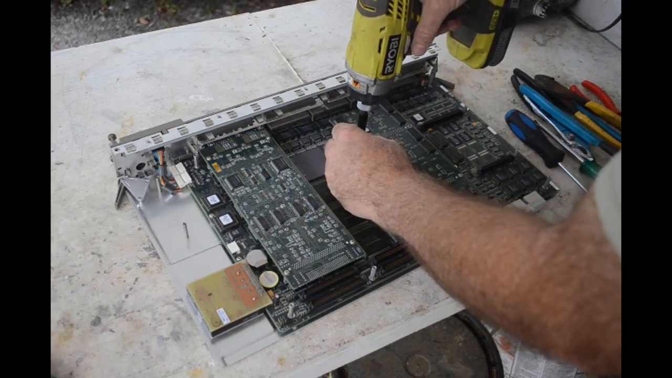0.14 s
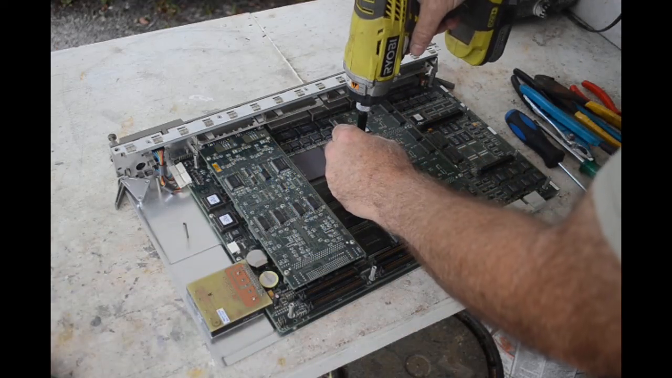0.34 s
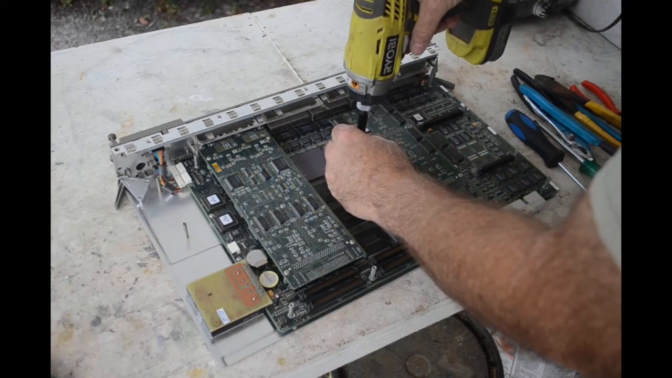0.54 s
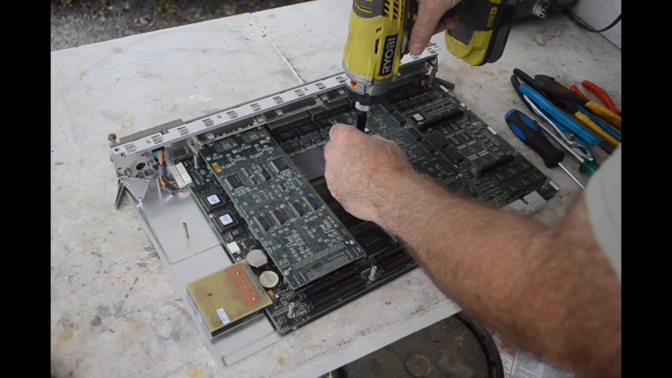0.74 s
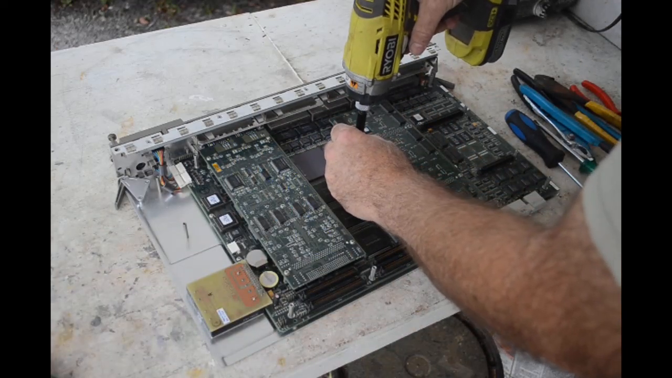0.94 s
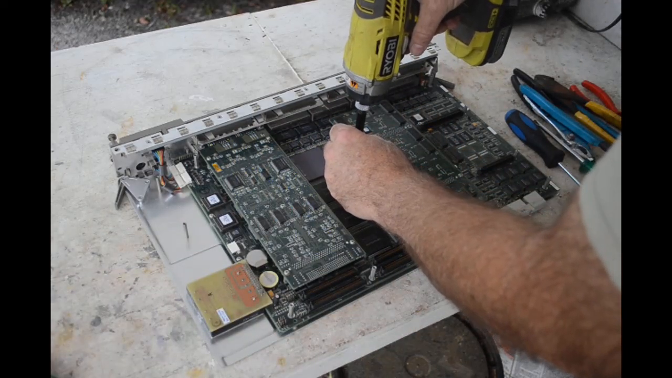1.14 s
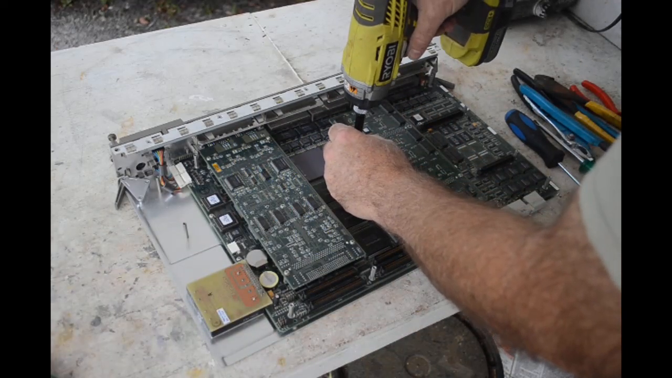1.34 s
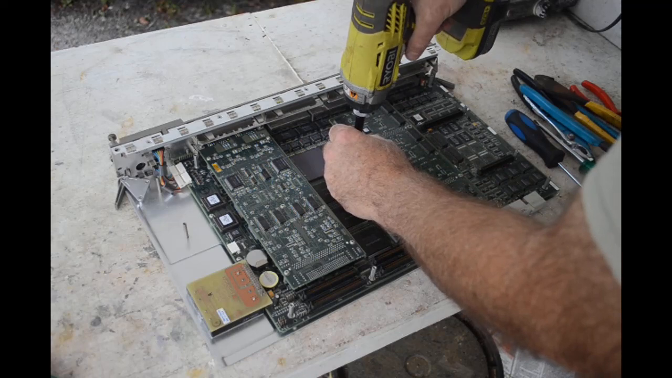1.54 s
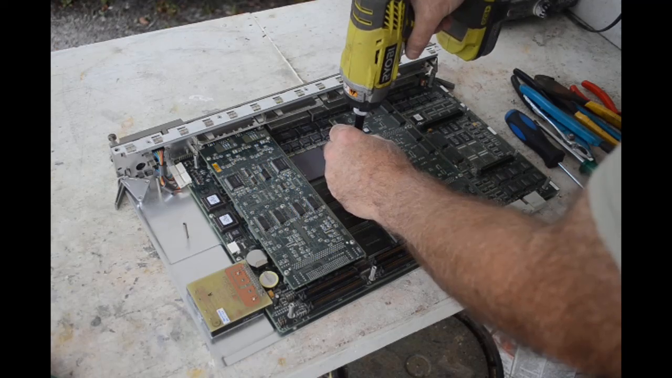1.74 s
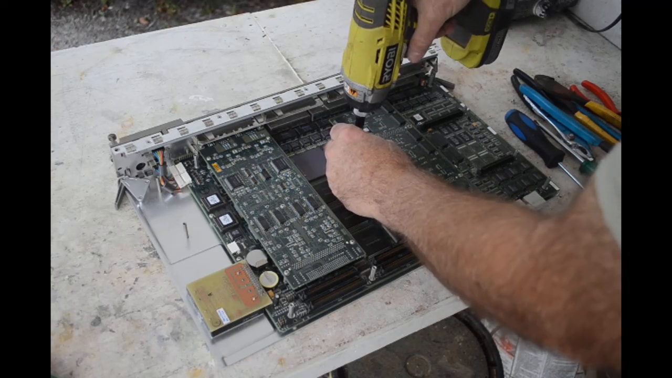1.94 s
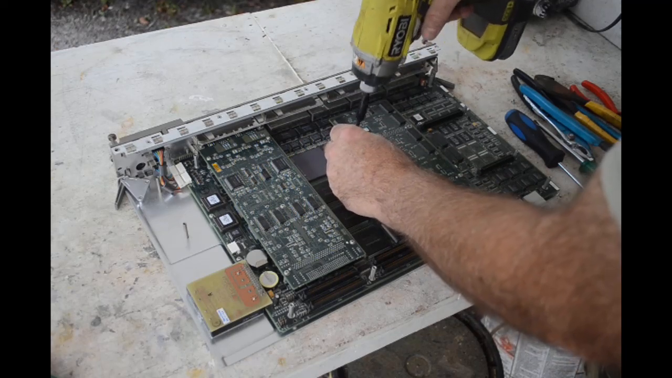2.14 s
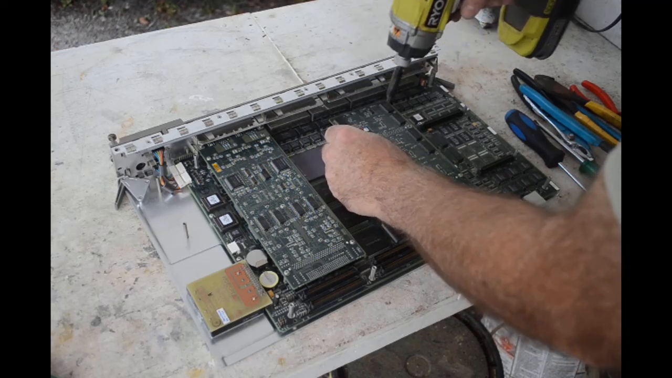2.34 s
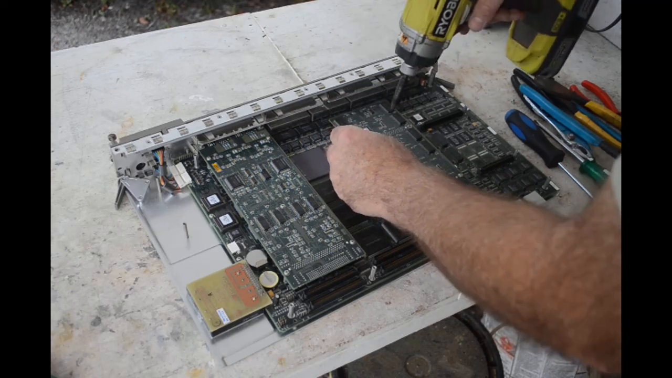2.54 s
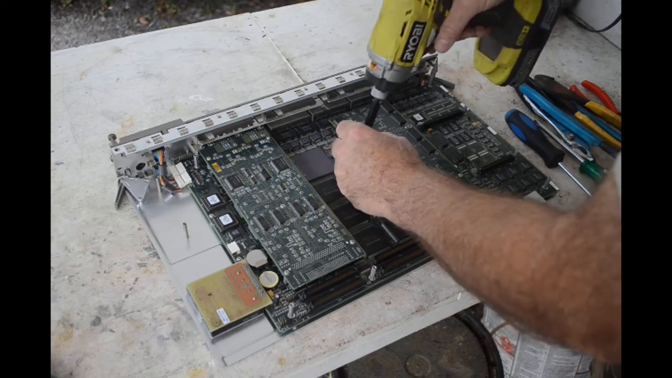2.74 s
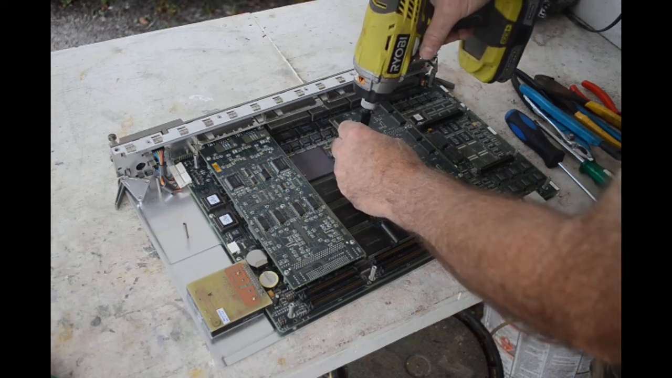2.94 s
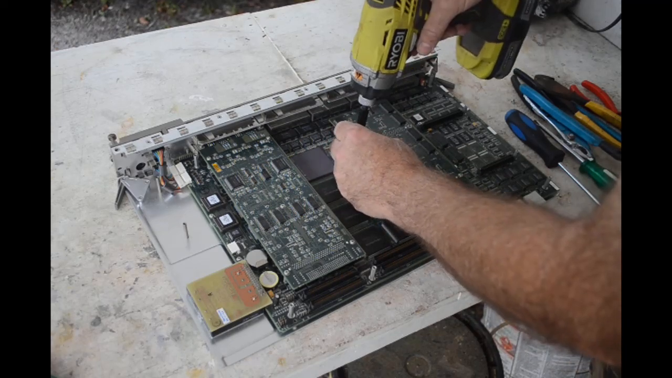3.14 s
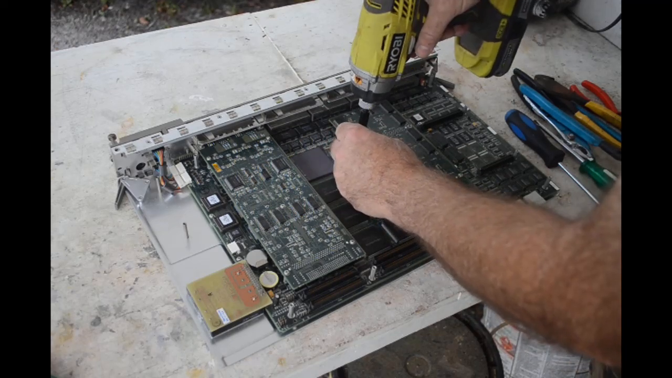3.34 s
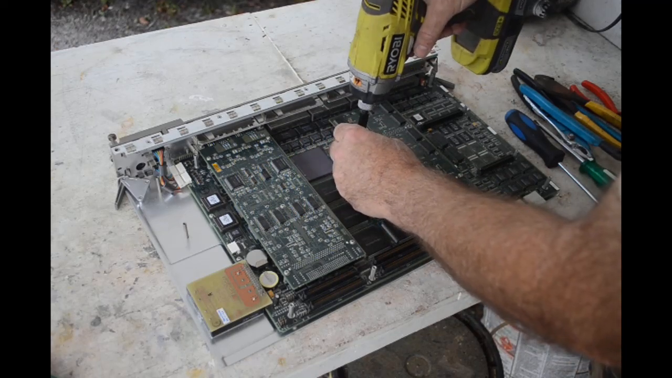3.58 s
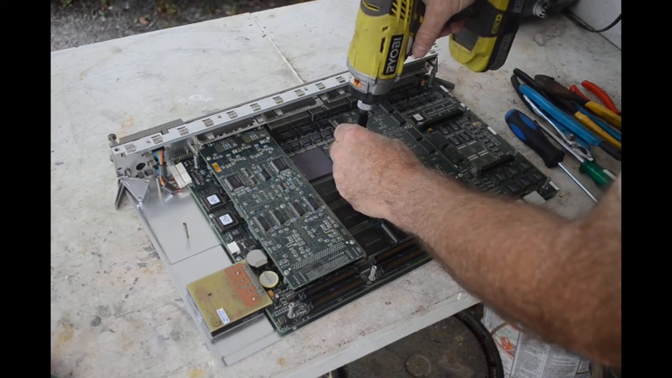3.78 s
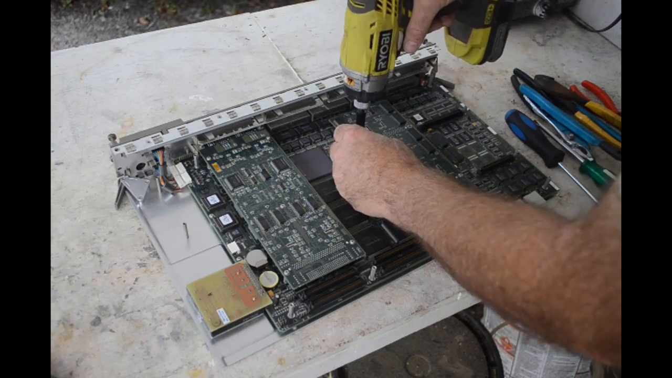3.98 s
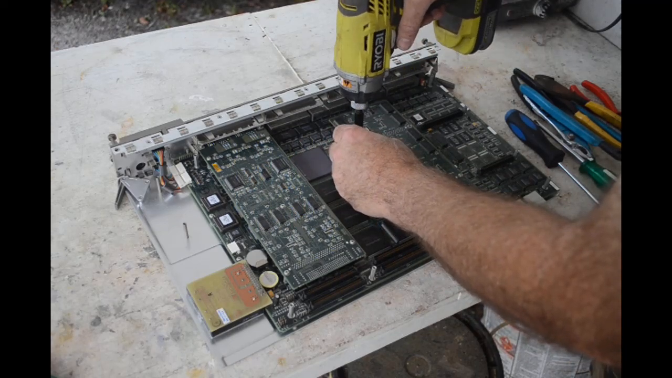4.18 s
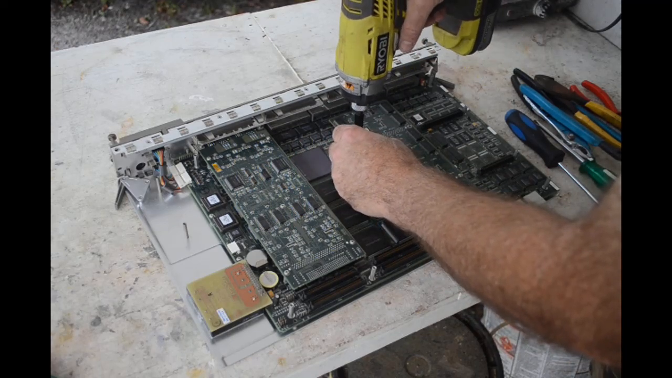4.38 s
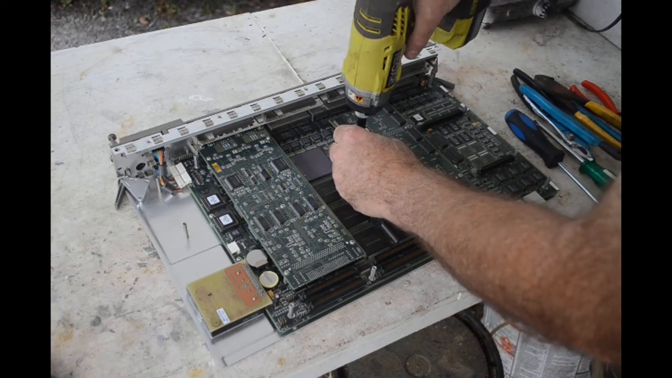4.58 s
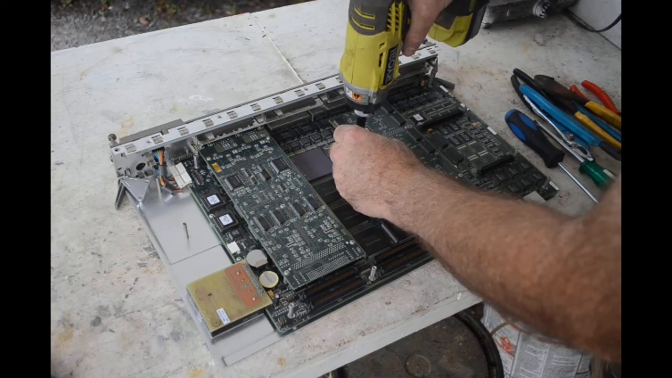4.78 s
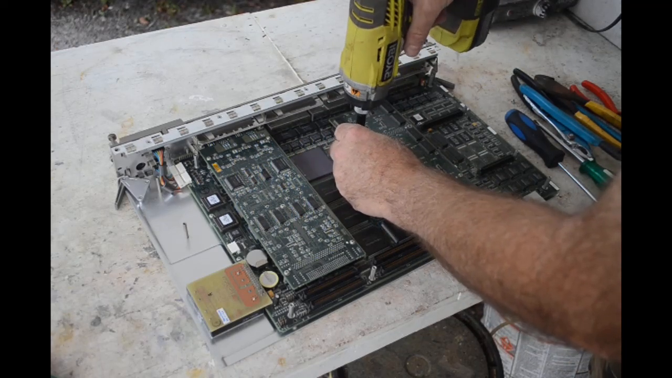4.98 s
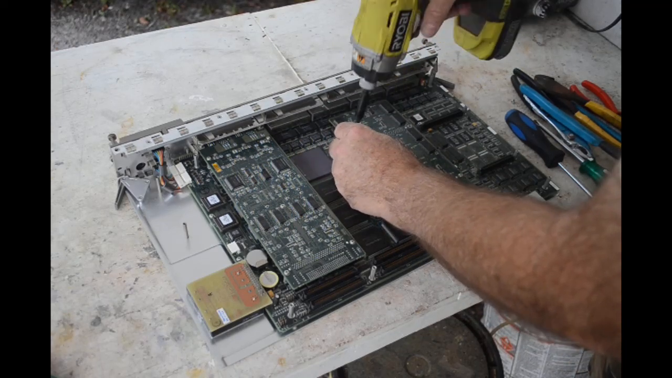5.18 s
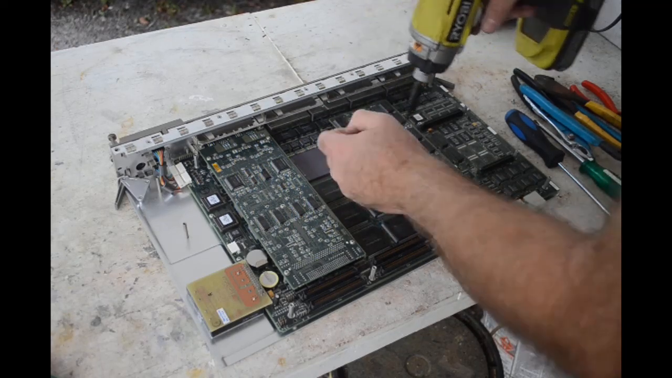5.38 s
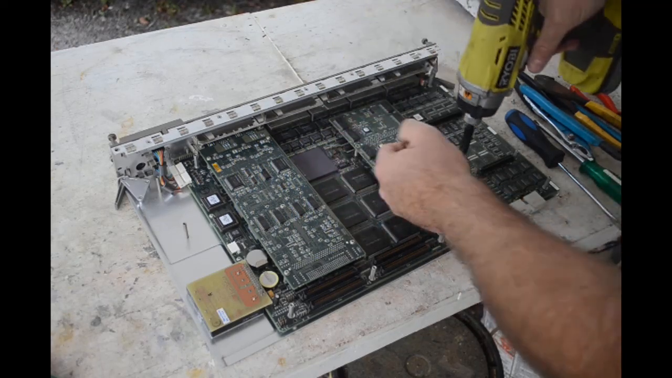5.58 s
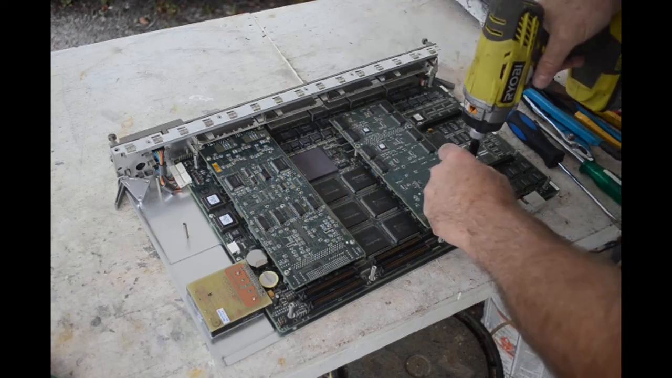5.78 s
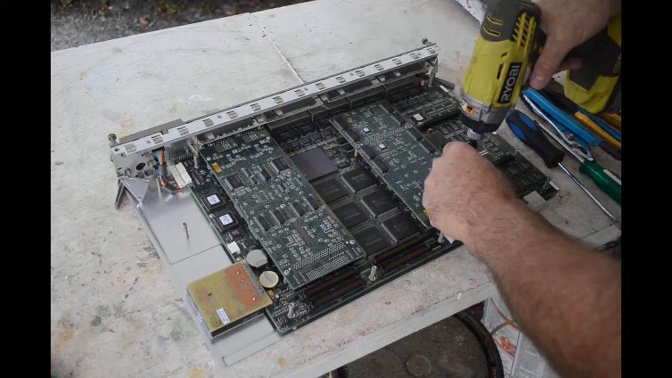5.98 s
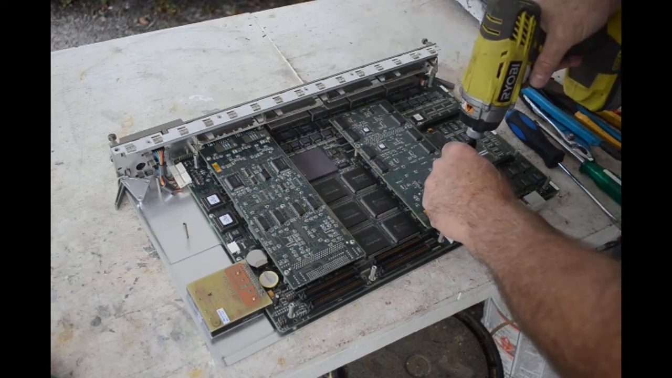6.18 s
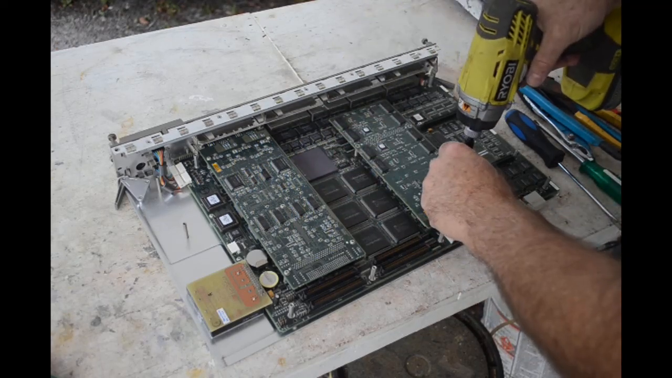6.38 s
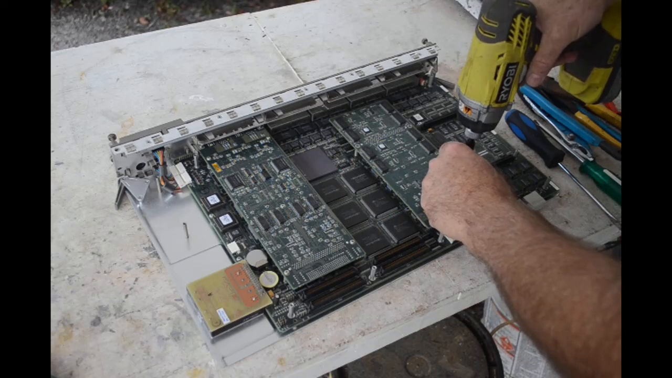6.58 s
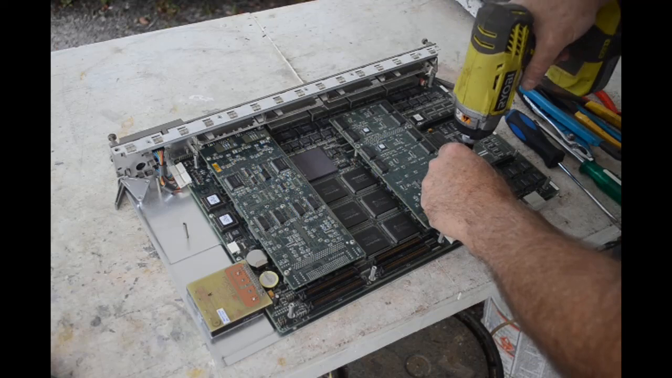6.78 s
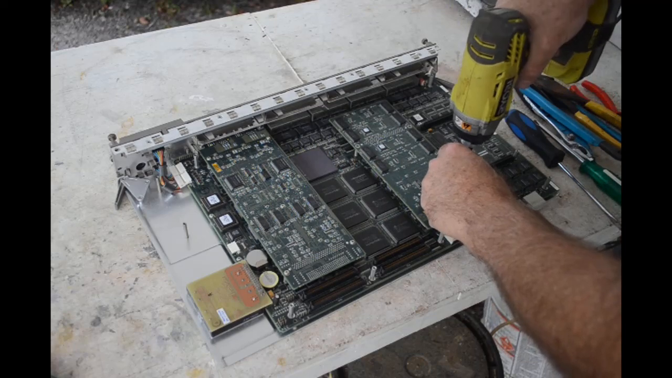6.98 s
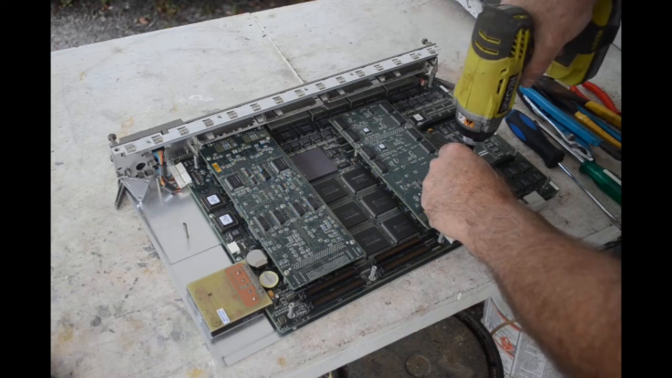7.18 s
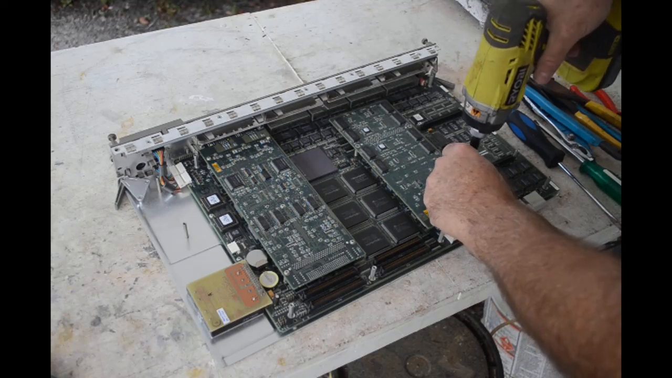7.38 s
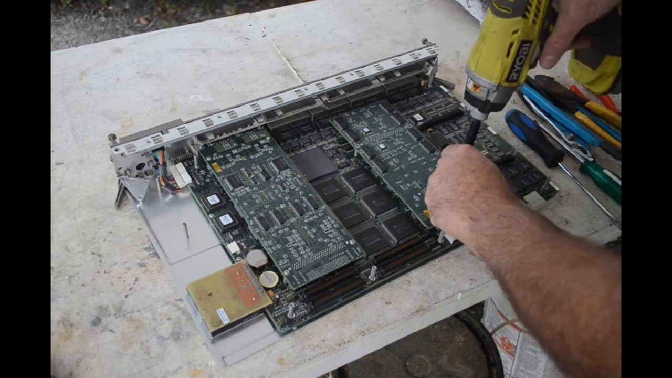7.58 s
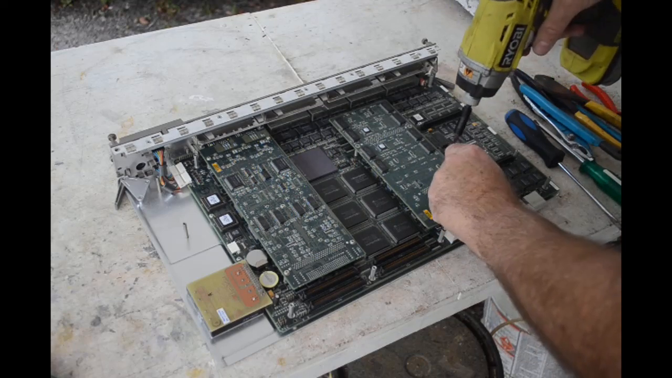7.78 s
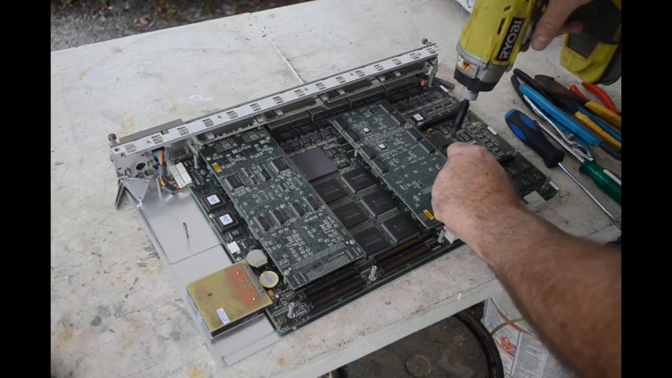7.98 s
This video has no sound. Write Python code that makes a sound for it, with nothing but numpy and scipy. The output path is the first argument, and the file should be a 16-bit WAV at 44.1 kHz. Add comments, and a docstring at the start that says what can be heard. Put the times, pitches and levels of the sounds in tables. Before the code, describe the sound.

Three brief drill runs rattle and whine against a board in a metal chassis, each ticking to a halt, with light taps and scuffs between.

```python
"""Short, squealing, whirring motor runs amid knocks: a cordless drill backs three small screws out of a circuit board
in a metal chassis on an outdoor table. Blows ring chassis modes amid noise clatter; the motor is gear rattle, brush hiss
and tones that follow its speed. The loose screw skips on its last thread in runs of blows, and the gearbox ticks to
a halt in short noise snaps. Scuffs and light touches are heard between, over a low beating hum and a distant wash."""
import sys
import numpy as np
from scipy import signal
from scipy.fft import rfft, irfft, next_fast_len
from scipy.io import wavfile
from scipy.ndimage import map_coordinates

SR = 44100
rng = np.random.default_rng(int(sys.argv[2]) if len(sys.argv) > 2 else 0)


def wav_out(sig):
    """Save sig, one row per channel (or a flat mono array), as 16-bit PCM at SR to the path in sys.argv[1]."""
    wavfile.write(sys.argv[1], SR, np.round(np.clip(np.atleast_2d(sig).T, -1, 1) * 32767).astype(np.int16))


N = 353723
TIME = np.arange(N) / SR

# one motor run for each screw: (trigger squeezed [s], time driven [s], speed it heads for [turns per s],
# easing off before the release [s], whine level at the squeeze [dB])
MOTOR_RUNS = [(1.564, .445, 430, .08, -21.5), (4.646, .39, 456, .02, -28), (6.975, .41, 424, .06, -26)]
# the load in each run: (time under load [s], gear noise [dB], its fall once the screw is free [dB],
# brush hiss [dB], its fall [dB], squeal [dB])
LOADS = [(0.128, -25, 2.5, -29.5, 4.5, -33.5), (.14, -20, 6.5, -23.5, 17, -34.5),
         (.205, -25.5, 1.5, -29.5, 14, -40.5)]
# one row for each screw: the columns of its motor run, then those of its load
TRIGGERS = [run + load for run, load in zip(MOTOR_RUNS, LOADS)]

COAST_S = 0.22  # from the release of the trigger to standstill
PRESSED_DIRECT = 2.7  # the running drill is pressed on the board and damps it: more blow, less ring


def from_db(db):
    """Decibels to gain."""
    return 10 ** (np.asarray(db) / 20)


def rms_one(x):
    """Scale to unit rms."""
    return x / np.sqrt(np.mean(x ** 2) + 1e-20)


def add(out, s, sound):
    """Mix a sound in at a given time in seconds."""
    at = max(round(s * SR), 0)
    out[at:at + len(sound)] += sound[:N - at]


def cut(x, hz, kind, order=2):
    """Butterworth filter."""
    safe_hz = np.clip(hz, 10, .45 * SR)
    return signal.sosfilt(signal.butter(order, safe_hz, kind, fs=SR, output="sos"), x)


def colour(x, spectrum):
    """Give a noise a spectrum, falling away below its first point; rms 1."""
    hz, db = np.transpose(spectrum)
    size = next_fast_len(len(x))
    bins = np.maximum(np.arange(size // 2 + 1) * SR / size, 1)
    gain = from_db(np.interp(np.log(bins), np.log(hz), db))
    gain = gain * np.minimum(bins / hz[0], 1) ** 2
    return rms_one(irfft(rfft(x, size) * gain, size)[:len(x)])


def drift(rate):
    """Smooth chance with an rms of 1, changing about `rate` times a second."""
    knots = rng.standard_normal(4096)
    return rms_one(map_coordinates(knots, [TIME * rate], order=2, mode="wrap"))


def resonance(x, hz, width_hz):
    """Two-pole resonance with gain 1 on top."""
    r = np.exp(-np.pi * width_hz / SR)
    feedback = [1, -2 * r * np.cos(2 * np.pi * hz / SR), r * r]
    return signal.lfilter(np.array([1, 0, -1]) * (1 - r * r) / 2, feedback, x)


def fade(t, t60):
    """Exponential decay by 60 dB in t60 seconds."""
    return np.exp(-np.log(1000) * t / t60)


def drill(grain_db=2.0, spark_db=1.5, flutter_db=2.0):
    """Grainy gear rattle in the housing and brush hiss that pulses with each turn, with the whine on top."""
    # gear rattle: (frequency [Hz], relative level [dB])
    gear_colour = [(60, -27), (180, 4), (1000, 4), (2200, 0.5), (3400, 3), (4700, -25.5), (5800, -12),
                   (16000, -51)]
    # brush sparking: (frequency [Hz], relative level [dB])
    brush_colour = [(1500, -6), (4700, 6.5), (5800, -6.5), (7500, 4.5), (8600, -2), (10500, -2),
                    (13000, -9), (16000, -13.5)]
    # drill housing resonances: (frequency [Hz], width [Hz], gain [dB])
    housing = [(684, 60, 10), (790, 40, 10.5), (1090, 200, 2.5), (1447, 67, 7), (2170, 120, 4)]
    grind_hiss_db = -4.5  # brush hiss in a grind, relative to its rattle
    speed, gear, hiss = motor()
    grind = grinding()
    turns = np.cumsum(speed) / SR
    # part of the rattle repeats on every turn, as the same uneven teeth meet again
    repeating = rms_one(sum(np.sin(2 * np.pi * (k * turns + rng.random())) for k in range(4, 22)))
    loose = rms_one(rng.standard_normal(N) * from_db(grain_db * drift(500)))
    rattle = colour(loose + .22 * repeating, gear_colour)
    ringing = sum(from_db(db) * resonance(rattle, hz, width) for hz, width, db in housing)
    rattle = rms_one(rattle + ringing)
    pulse_db = spark_db * np.cos(2 * np.pi * turns)
    sparks = colour(rng.standard_normal(N) * from_db(pulse_db + grain_db * drift(980)), brush_colour)
    rattle_gain = np.hypot(gear, grind)
    spark_gain = np.hypot(hiss, from_db(grind_hiss_db) * grind)
    noise = rattle_gain * rattle + spark_gain * sparks
    return noise * from_db(flutter_db * drift(90)) + whine(speed, turns)


def motor(spin_up_s=.076, gear_lag_s=.012, engage_s=0.036, unload_s=0.08, brake_t60_s=0.19):
    """Speed and the gains of gears and brushes: spin up, work against the screw, run free, brake and coast."""
    coast_gear_db, coast_hiss_db = -38, -40
    speed, gear, hiss = np.zeros((3, N))
    t = np.arange(SR) / SR
    # the gears take up their slack
    engaged = 1 - np.exp(-(np.maximum(t - gear_lag_s, 0) / engage_s) ** 4)
    for s, driven, top_speed, easing, _, loaded, gear_db, gear_fall_db, hiss_db, hiss_fall_db, _ in TRIGGERS:
        slowing = np.clip((driven + COAST_S - t) / (easing + COAST_S), 0, 1)
        free = 1 - np.exp(-np.maximum(t - loaded, 0) / unload_s)
        power = fade(np.maximum(t - driven, 0), brake_t60_s)
        driven_gear = power * from_db(gear_db - gear_fall_db * free)
        driven_hiss = power * from_db(hiss_db - hiss_fall_db * free)
        add(speed, s, top_speed * (1 - np.exp(-t / spin_up_s)) * slowing)
        add(gear, s, engaged * np.hypot(driven_gear, slowing * from_db(coast_gear_db)))
        add(hiss, s, engaged * np.hypot(driven_hiss, slowing * from_db(coast_hiss_db)))
    return speed, gear, hiss


def grinding(attack_s=0.0015):
    """Gain of the short spells of harder grinding: quick attack, hold, quick release."""
    # the motor brakes or the screw binds: (time [s], length of the hold [s], level [dB])
    grinds = [(2.007, 0.056, -22), (5.033, 0.049, -24), (7.156, 0.028, -19), (7.383, .022, -23)]
    out, t = np.zeros(N), np.arange(SR // 4) / SR
    for s, length, db in grinds:
        add(out, s, from_db(db) * (1 - np.exp(-t / attack_s)) * np.exp(-(t / length) ** 4))
    return out


def whine(speed, turns, waver_db=3.0, full_speed=380, fall_db_per_s=32):
    """Teeth and commutator bars sing at multiples of the motor speed: louder as it rises, fading through each run."""
    # gear-mesh and commutator tones: (multiple of the motor speed, relative level [dB])
    whine_tones = [(6, -8.5), (9, -18), (12, -11.5), (14, -17)]
    angle = 2 * np.pi * (turns + .005 * drift(120))  # the turning jitters slightly
    tones = 0
    for k, db in whine_tones:
        tones = tones + np.sqrt(2) * from_db(db + waver_db * drift(25)) * np.sin(k * angle)
    starts, _, _, _, whine_db, *_ = np.transpose(TRIGGERS)
    run = np.searchsorted(starts, TIME) - 1
    level_db = whine_db[run] - fall_db_per_s * abs(TIME - starts[run])
    rise = np.minimum(speed / full_speed, 1) ** 4
    return from_db(level_db) * rise * cut(tones, 5100, "low", order=12)


def squeal(start_hz=5200, end_hz=4100, glide_s=.021, swell_s=.034, spread_s=.011):
    """The speed control chops the current: the windings squeal roughly, falling in pitch, as the motor spins up."""
    out, t = np.zeros(N), np.arange(SR // 12) / SR
    for s, *_, db in TRIGGERS:
        hz = end_hz + (start_hz - end_hz) * np.exp(-(t / glide_s) ** 4)
        hz = hz * (1 + .25 * rng.standard_normal(len(t)))  # roughness
        swell = np.exp(-abs(t - swell_s) / spread_s)
        add(out, s, from_db(db) * np.sqrt(2) * swell * np.sin(2 * np.pi * np.cumsum(hz) / SR))
    return out


def knock(levels_db, contact, direct, clatter_db=2.0, clatter_t60=0.13, crack_t60=0.11, direct_s=0.014,
          hand_damping=1.23):
    """One blow: the chassis modes ring amid the dense clatter of board and table."""
    # chassis and board modes: (centre frequency [Hz], mean relative level [dB], t60 before the hands damp it [s])
    chassis = [(117.7, -17.5, 0.76), (184.4, -12.5, 0.22), (346, -13.5, 0.31), (435.7, -14.5, 0.21),
               (697, -7, 0.24), (738.8, 3, 0.12), (817, -7, 0.2), (1070, -3, 0.19), (1221, -11, 0.34),
               (1409, -5, 0.15), (1502, -4, 0.15), (1830, -5, 0.11), (2011, -2, 0.056), (2272, -5, 0.043),
               (3680, -12.5, 0.044)]
    # clatter of board and table: (frequency [Hz], relative level [dB])
    clatter_colour = [(90, -4.5), (800, 2.5), (2200, -1.5), (4200, -0.5), (6000, -27), (7400, -24),
                      (10000, -37), (16000, -45.5)]
    thump_hz, crack_hz = 554, 3637  # a knock's body lies between its thump and its crack
    t = np.arange(SR // 4) / SR
    hz, db, t60 = np.transpose(chassis)[:, :, None]
    strength = from_db(db + 3.8 * rng.standard_normal(hz.shape))
    # the modes shift a little with the spot and the pressure of the hands
    hz = hz * (1 + .012 * rng.standard_normal(hz.shape))
    swings = np.sin(2 * np.pi * (hz * t + rng.random(hz.shape)))
    modes = np.sum(strength * swings * fade(t, t60 / hand_damping), axis=0)
    noise = colour(rng.standard_normal(len(t)), clatter_colour)
    clatter = cut(noise, crack_hz, "low") * fade(t, clatter_t60)
    clatter = clatter + cut(noise, crack_hz, "high") * fade(t, crack_t60)
    # the force builds over the contact time; the first swings are the largest, then the energy spreads into the table
    force = (1 - np.exp(-(t / contact) ** 2)) * (1 + direct * np.exp(-(t / direct_s) ** 2))
    blow = (modes + from_db(clatter_db) * clatter) * force
    thump = cut(blow, thump_hz, "low", order=4)
    body = cut(blow, [thump_hz, crack_hz], "band", order=3)
    crack = cut(blow, crack_hz, "high", order=4)
    # each band's level is that of its first 20 ms
    return sum(from_db(db) * part / np.std(part[:SR // 50]) for db, part in zip(levels_db, (thump, body, crack)))


def knocks(contact_s=0.0015, contact_at_db=-24.5, shortening=0.61):
    """The bit finds the screw head and bites; harder blows have a shorter contact."""
    # the bit knocks on screw and chassis: (time [s], thump [dB], body [dB], crack [dB])
    blows = [(0.014, -40.5, -48, -77), (0.114, -40, -49, -82), (0.5, -42, -41, -57),
             (0.714, -30, -29, -43.5), (1.208, -45.5, -49, -85), (1.323, -28, -22.5, -57),
             (1.395, -22.5, -22.5, -44.5), (1.654, -40, -17, -20), (2.041, -30.5, -19.5, -24),
             (2.969, -31.5, -38, -50.5), (3.326, -28, -18.5, -41), (3.513, -36, -36, -69),
             (3.581, -35, -40, -73), (3.964, -46.5, -51, -82), (4.265, -29, -31.5, -42),
             (4.393, -31.5, -45, -67), (4.502, -25.5, -38.5, -58), (4.52, -25, -27.5, -54),
             (4.706, -40, -17, -20), (5.897, -32, -39, -75), (5.95, -34.5, -43, -72),
             (6.093, -46, -48, -79), (6.382, -30, -24.5, -37.5), (6.434, -39, -30.5, -71),
             (6.552, -36.5, -36, -60), (6.594, -32, -34.5, -46.5), (6.795, -21, -23.5, -40),
             (7.024, -26, -10.5, -27), (7.046, -28, -23, -50), (7.61, -46, -41, -53)]
    out = np.zeros(N)
    for s, thump_db, body_db, crack_db in blows:
        pressed = any(start < s < start + driven + COAST_S for start, driven, *_ in TRIGGERS)
        contact = contact_s * from_db(shortening * (contact_at_db - body_db))
        add(out, s, knock((thump_db, body_db, crack_db), contact, PRESSED_DIRECT if pressed else 1))
    return out


def skips(thump_loss_db=1.5, crack_loss_db=5, lowest_hz=99):
    """The freed screw drops off its last thread once a turn; thump and crack soften as the hand eases off."""
    # runs of drops: (first drop [s], first period [s], lengthening per turn [s], number of drops)
    drop_runs = [(1.699, .032, 0, 2), (1.809, .033, 0, 3), (4.828, .0252, .00039, 9),
                 (7.198, .0328, .0009, 6)]
    # force of each run: (first thump [dB], body [dB], first crack [dB], first contact time [s], its growth per drop [s])
    forces = [(-31, -46, -52, 0.0038, .001), (-27.5, -26.5, -53, 0.0027, .0002),
              (-17, -19, -32, 0.0016, .00005), (-21, -18, -24, 0.0019, 0.00064)]
    out = np.zeros(N)
    for (s, period, lengthening, count), force in zip(drop_runs, forces):
        thump_db, body_db, crack_db, contact, softening = force
        for k in range(count):
            levels_db = thump_db - thump_loss_db * k, body_db, crack_db - crack_loss_db * k
            add(out, s, knock(levels_db, contact + softening * k, PRESSED_DIRECT))
            s += period + lengthening * k
    return cut(out, lowest_hz, "high")  # the pressed board cannot swing more slowly


def ticks(ring_db=-4.5, ring_t60=0.045):
    """Small steel parts snap together and ring briefly in the housing."""
    # lone light metal ticks of the bit and the loose screw: (time [s], level [dB])
    lone_ticks = [(0.91, -50), (2.959, -33.5), (6.25, -52), (7.707, -44)]
    # steel snap: (frequency [Hz], relative level [dB])
    tick_colour = [(400, -2), (1400, 2.5), (4300, 5), (6000, -6), (7600, -4), (16000, -18.5)]
    out, t = np.zeros(N), np.arange(SR // 16) / SR
    envelope = np.exp(-(t / .0019) ** 2) + from_db(ring_db) * fade(t, ring_t60)
    for s, db in [*lone_ticks, *lock_ticks()]:
        tick = colour(rng.standard_normal(len(t)), tick_colour) * envelope
        add(out, s, from_db(db) * tick / np.std(tick[:SR // 250]))
    return out


def lock_ticks(rebound_s=.016, period_s=.0218, fade_db_per_s2=850):
    """Times and levels of the gearbox ticks: evenly spaced after the rebound, fading ever faster."""
    # the gearbox lock catches, rebounds, then ticks on as the spindle runs down:
    # (time of the catch [s], its level [dB], number of ticks)
    run_downs = [(2.042, -22, 6), (5.0662, -23, 6), (7.4141, -22.5, 7)]
    for s, db, count in run_downs:
        for after in [0, *(rebound_s + period_s * np.arange(round(count) - 1))]:
            yield s + after, db - fade_db_per_s2 * after ** 2


def scuffs(grain_db=-1.5, low_hz=860, high_hz=3520):
    """Short, grainy slides of band-limited friction noise that swell and die away."""
    # the bit and the fingers slide over the board: (time [s], half the slide [s], peak level [dB])
    slides = [(0.147, 0.013, -51.5), (3.07, 0.023, -54.5), (3.544, 0.031, -55), (7.904, 0.011, -47)]
    out, t = np.zeros(N), np.arange(SR // 4) / SR
    for s, length, db in slides:
        add(out, s, from_db(db) * np.sin(np.pi * np.minimum(t / (2 * length), 1)))
    friction = rng.standard_normal(N) * from_db(grain_db * drift(160))
    return out * rms_one(cut(cut(friction, low_hz, "high"), high_hz, "low", order=4))


def handling(count=6, level_db=-46.5):
    """Fingers and bit brush the board: faint, dry touches at random moments."""
    out = np.zeros(N)
    for when in rng.random(count):
        add(out, when * N / SR, knock(level_db - np.array([6, 0, 10]), contact=0.0013, direct=0))
    return out


def outdoors(wash_db=-46.5, waver_db=0.43, hum_hz=61.3, hum_width_hz=5.9, hum_db=-48, second_db=-55.5, third_db=-59.5):
    """A distant noise wash, and a throbbing, slowly beating hum with two steadier overtones."""
    # distant wash: (frequency [Hz], relative level [dB])
    wash_colour = [(28, 2.5), (48, -9), (80, 6.5), (140, 0), (220, -1.5), (500, -5.5), (850, -5.5),
                   (1900, -18.5), (4000, -31), (8000, -43)]
    beat_depth, beat_period_s, beat_dip_s = 0.5, 2.07, 1.34
    wash = colour(rng.standard_normal(N), wash_colour) * from_db(wash_db + waver_db * drift(10))
    # two far machines hum at nearly the same pitch, so their hum beats slowly
    beat = abs(1 - beat_depth * np.exp(2j * np.pi * (TIME - beat_dip_s) / beat_period_s))
    hum = 0
    for k, gain in enumerate([from_db(hum_db) * beat, from_db(second_db), from_db(third_db)], 1):
        throb = 1 + (drift(2 * hum_width_hz) + 1j * drift(2 * hum_width_hz)) / 2
        hum = hum + gain * rms_one(np.real(throb * np.exp(2j * np.pi * k * hum_hz * TIME)))
    return wash + hum


def scene():
    """All sources are central; only the treble of the metal ticks differs a little between the ears."""
    metal = ticks()
    mid = drill() + squeal() + knocks() + skips() + scuffs() + metal + handling() + outdoors()
    late = np.pad(metal, (SR // 700, 0))[:N]
    side = from_db(-8) * cut(late, 5000, "high", order=6)
    return np.array([mid + side, mid - side])


def record(dry, top=1.35, hiss_db=-64.0, cutoff_hz=16000):
    """Each microphone adds its own hiss; peaks are rounded, the top is cut."""
    # microphone hiss: (frequency [Hz], relative level [dB])
    mic_colour = [(40, -3.5), (1200, -0.5), (3000, -5.5), (6000, -12), (15000, -13.5)]
    hiss = np.array([colour(white, mic_colour) for white in rng.standard_normal(dry.shape)])
    x = dry + from_db(hiss_db) * hiss
    rounded = top * np.tanh(x / top)
    return signal.sosfilt(signal.ellip(10, .1, 80, cutoff_hz, fs=SR, output="sos"), rounded)


dry = scene()
out = record(dry)
wav_out(out)
```